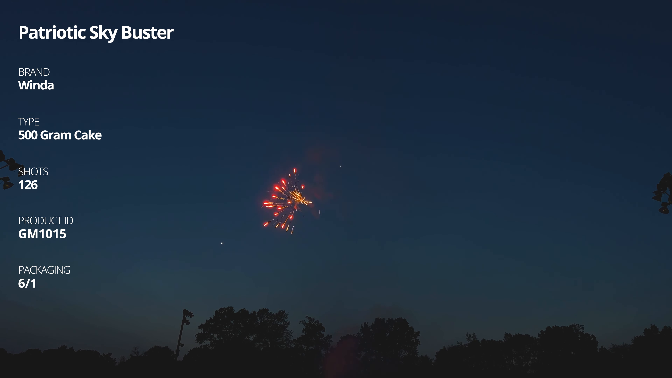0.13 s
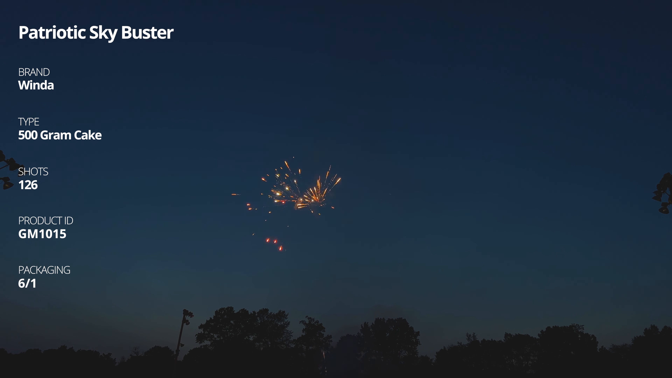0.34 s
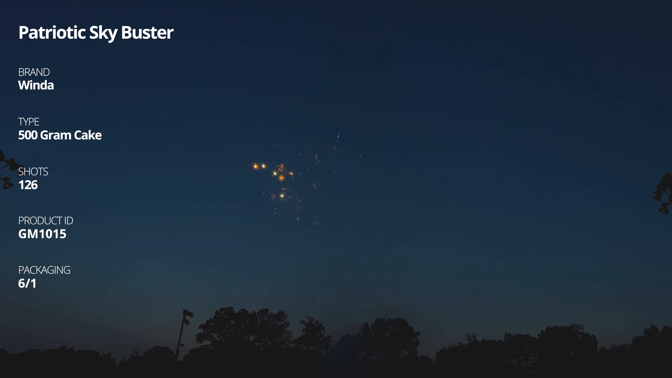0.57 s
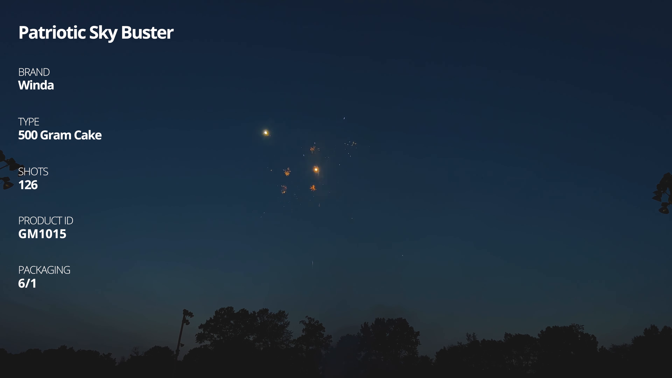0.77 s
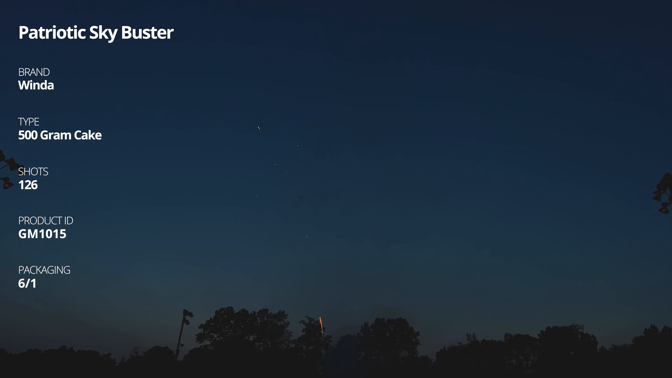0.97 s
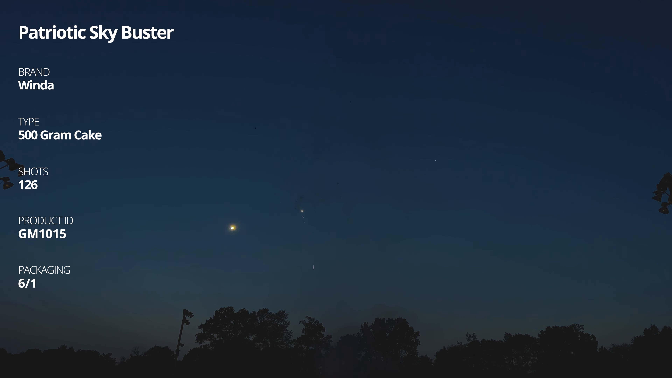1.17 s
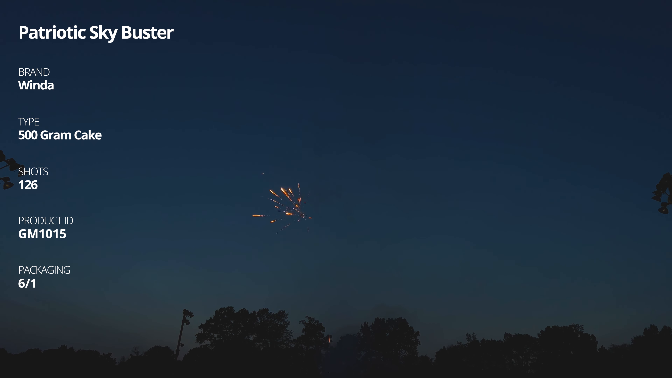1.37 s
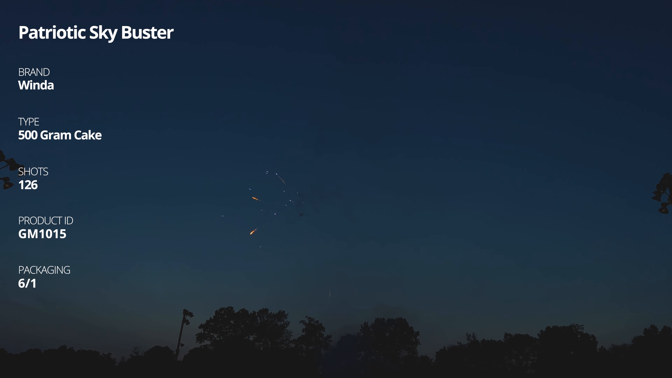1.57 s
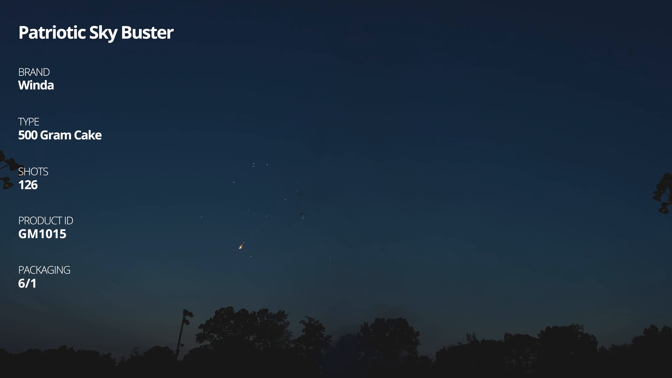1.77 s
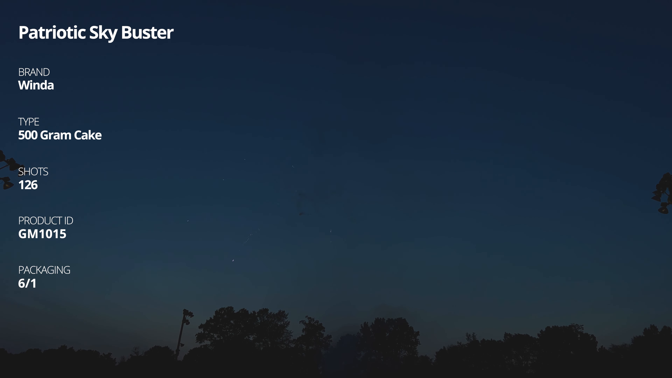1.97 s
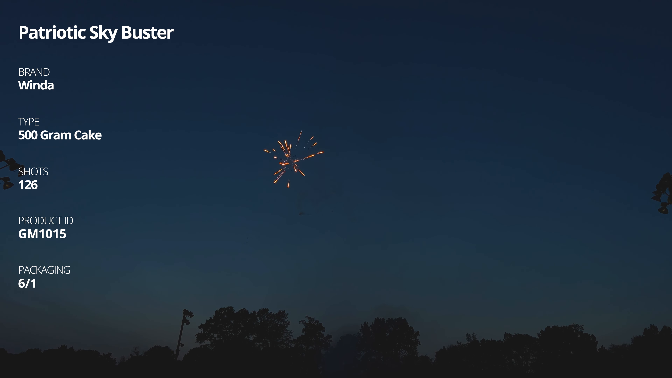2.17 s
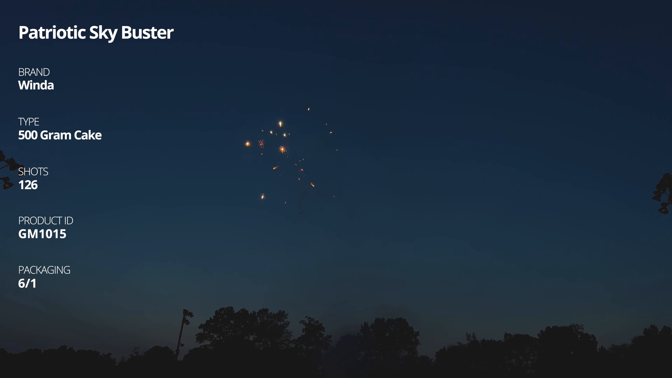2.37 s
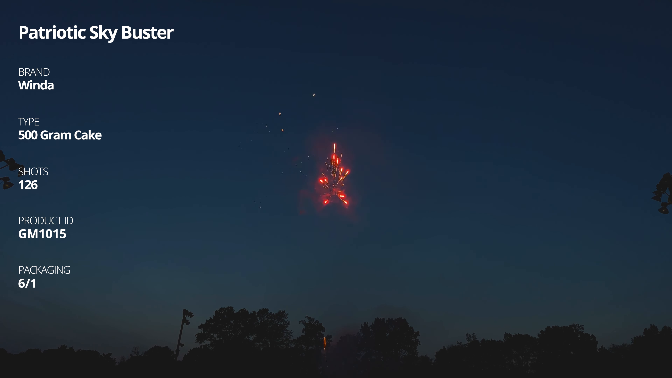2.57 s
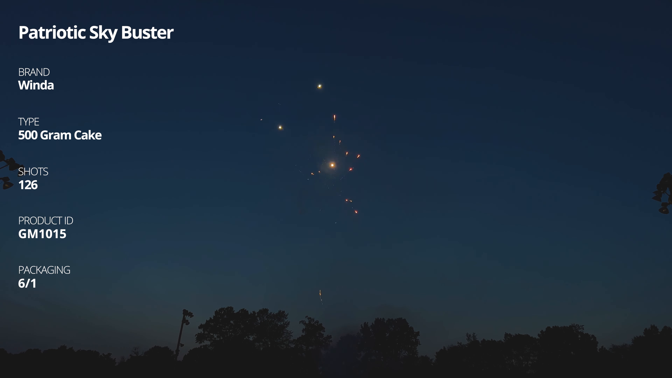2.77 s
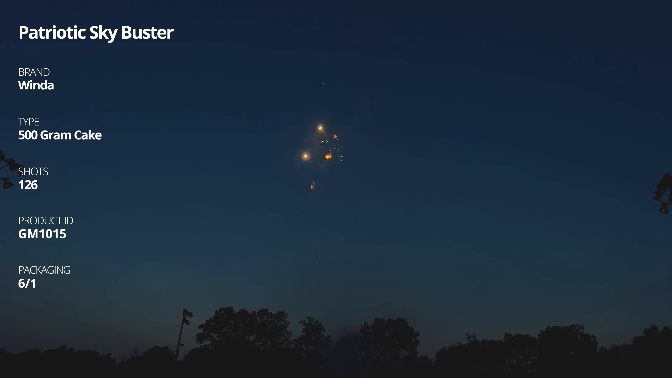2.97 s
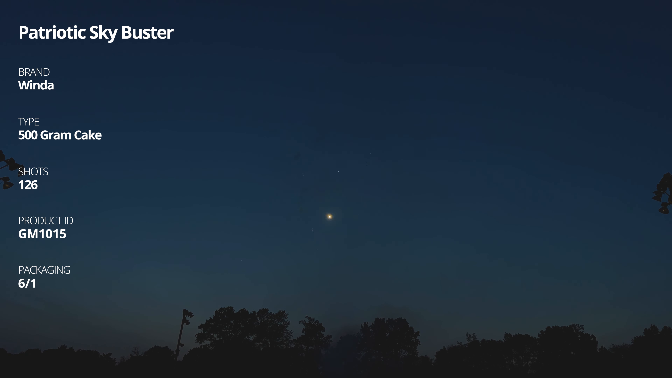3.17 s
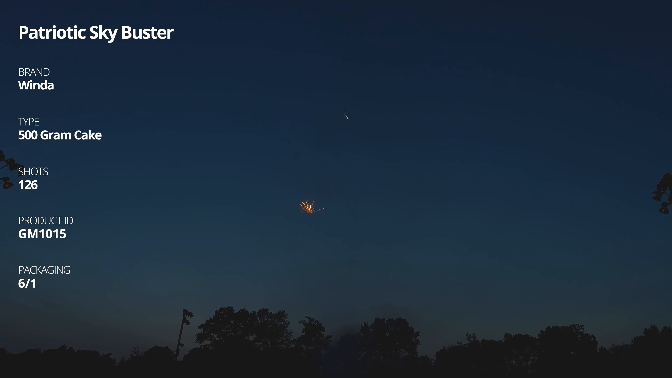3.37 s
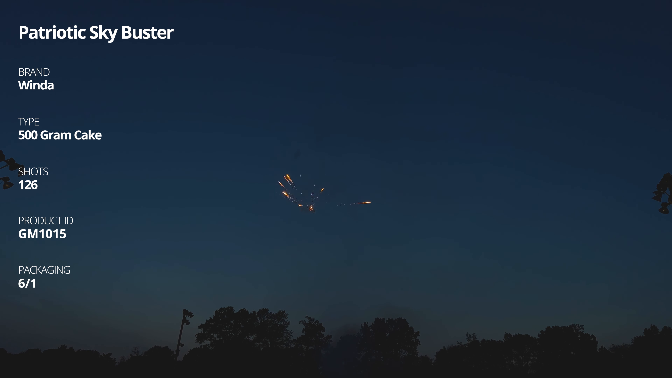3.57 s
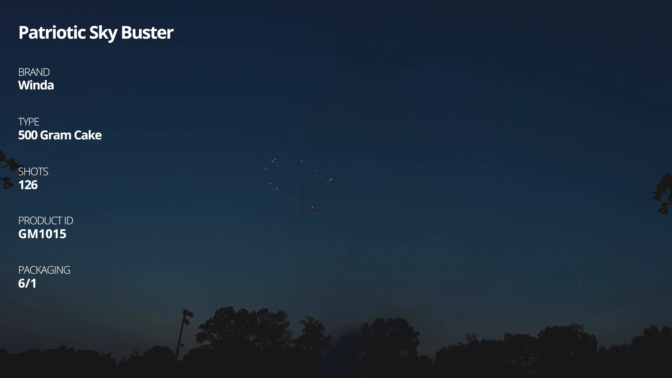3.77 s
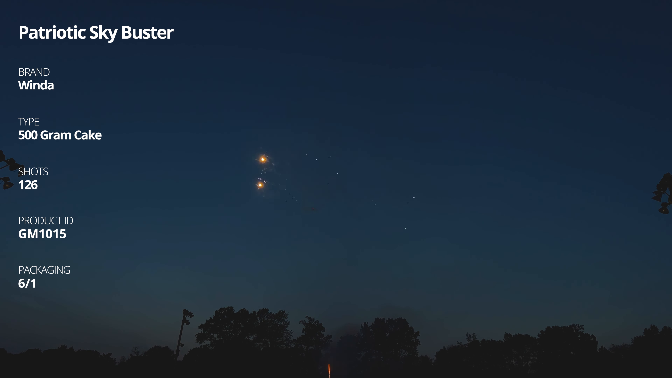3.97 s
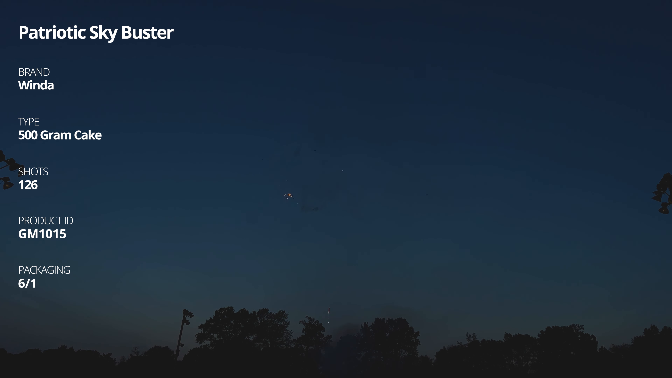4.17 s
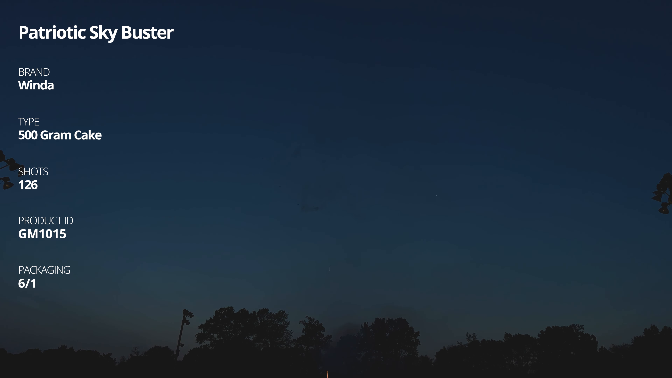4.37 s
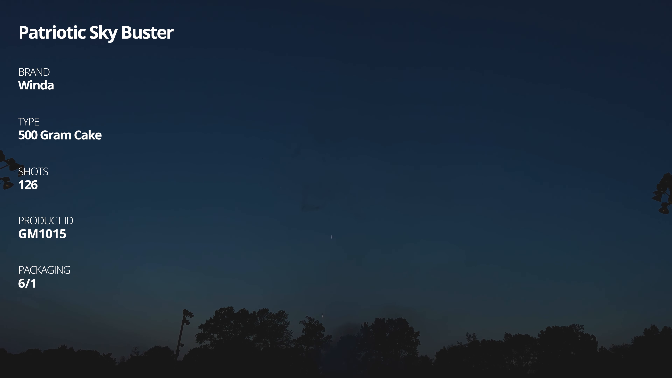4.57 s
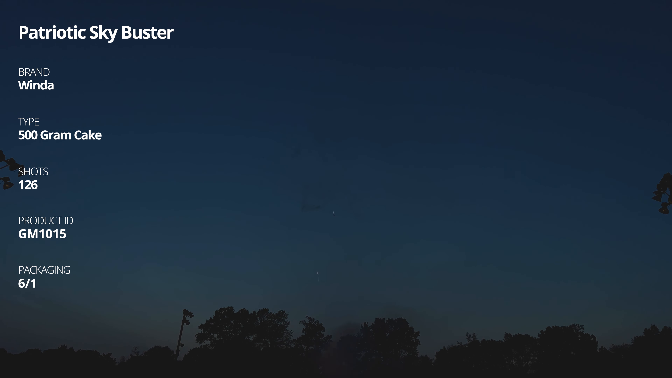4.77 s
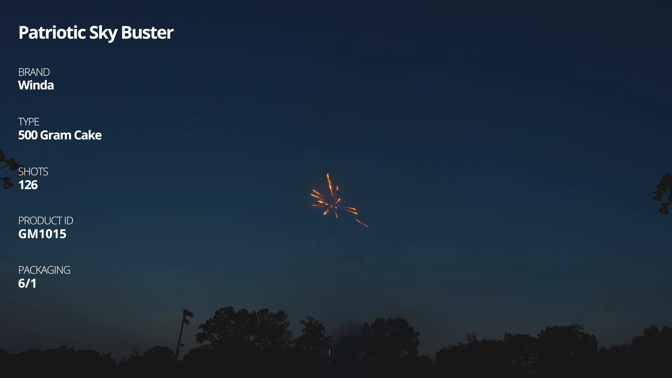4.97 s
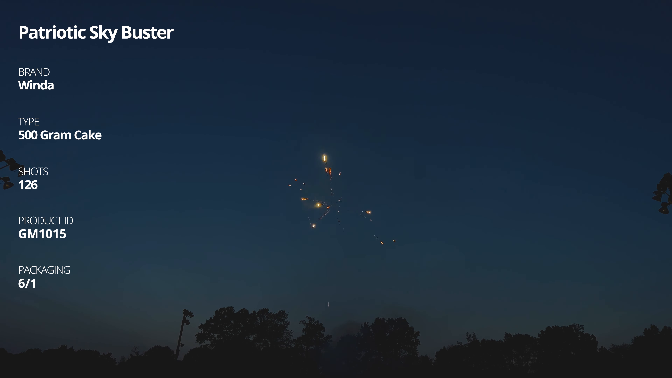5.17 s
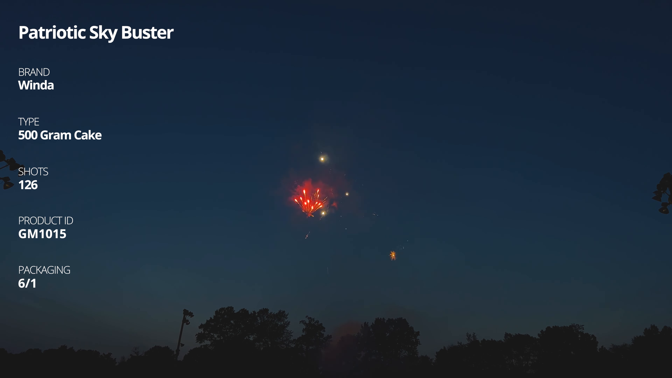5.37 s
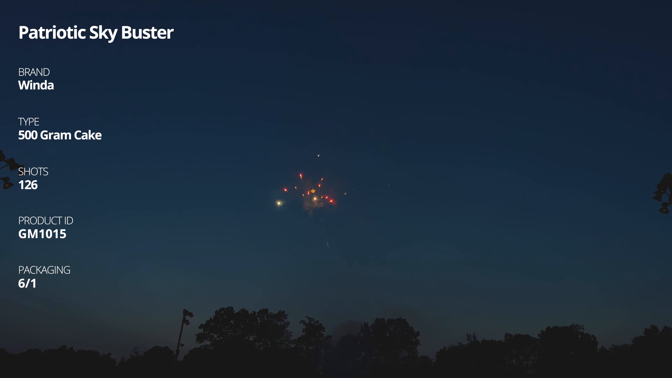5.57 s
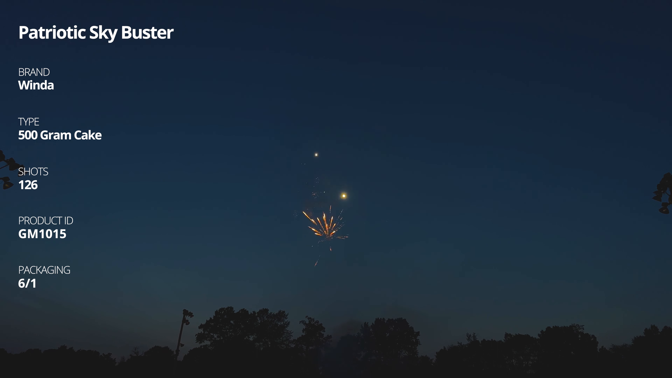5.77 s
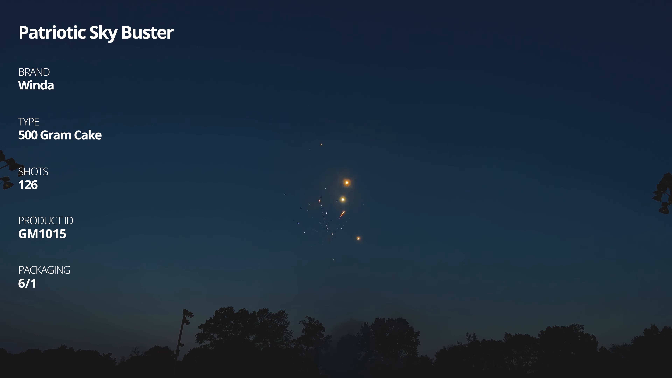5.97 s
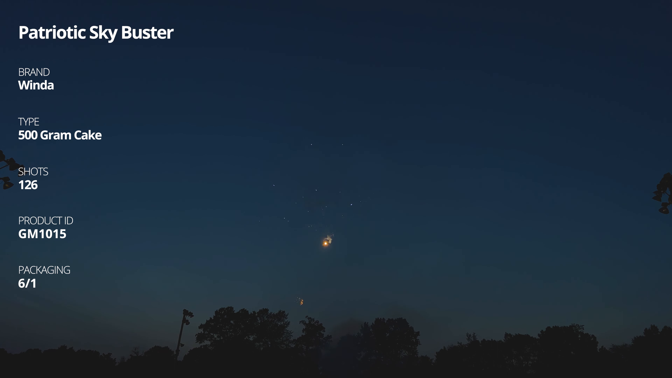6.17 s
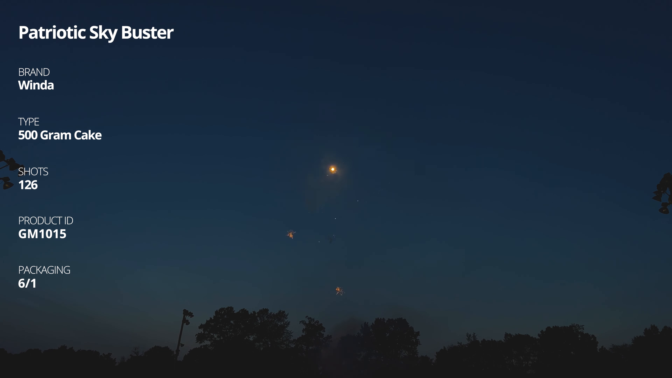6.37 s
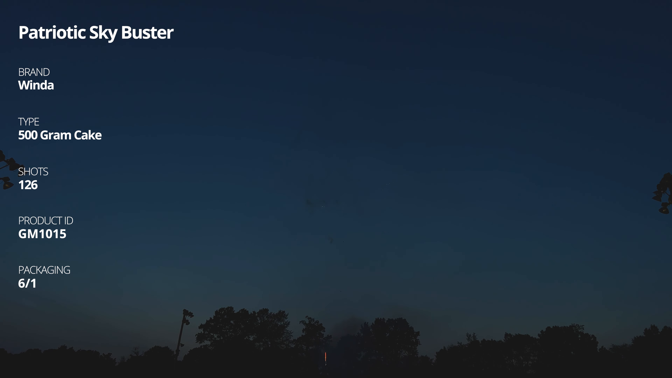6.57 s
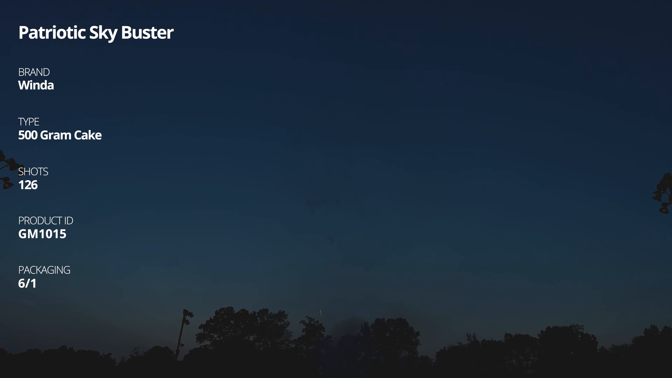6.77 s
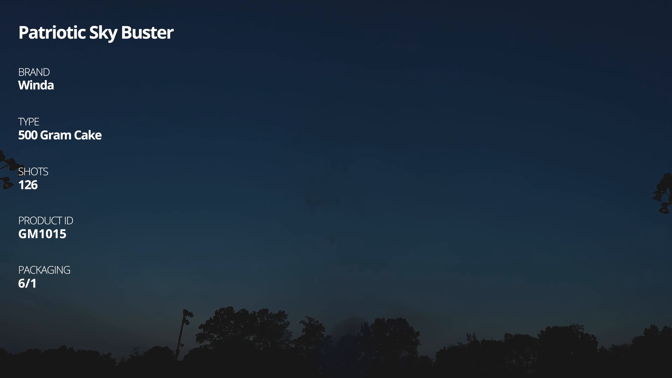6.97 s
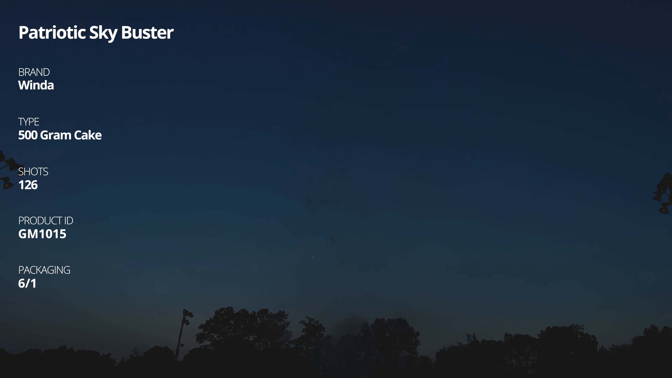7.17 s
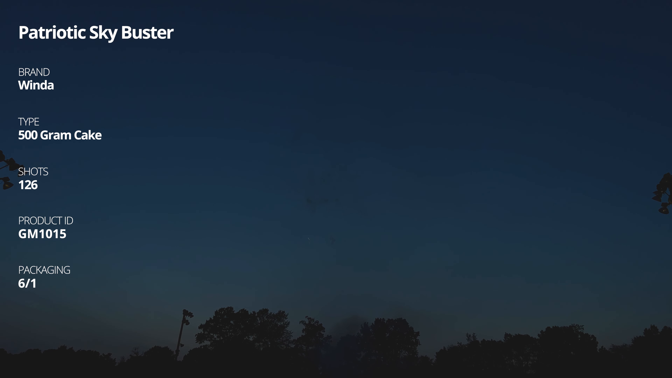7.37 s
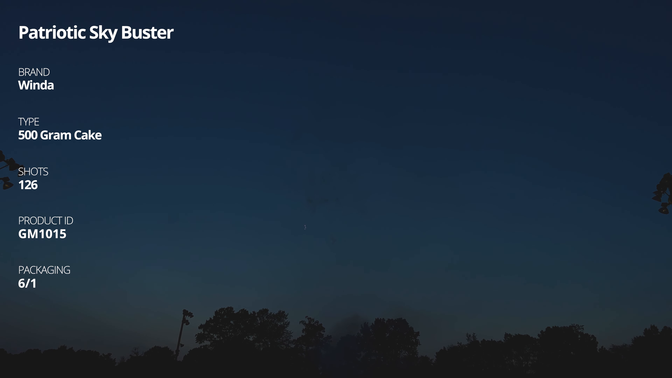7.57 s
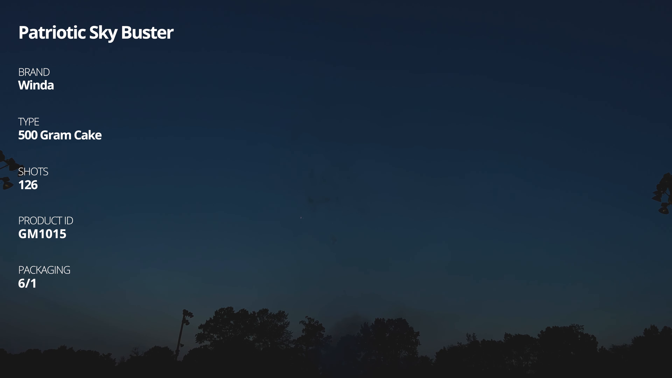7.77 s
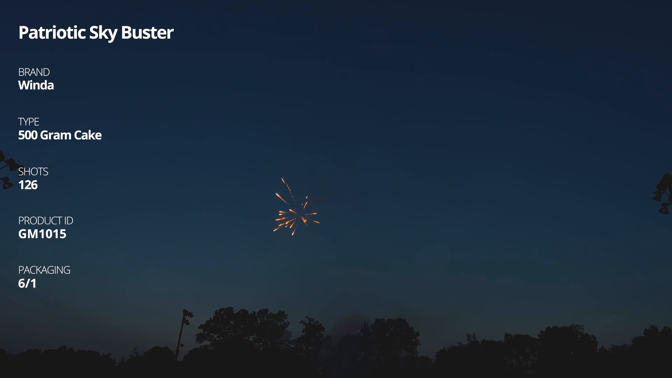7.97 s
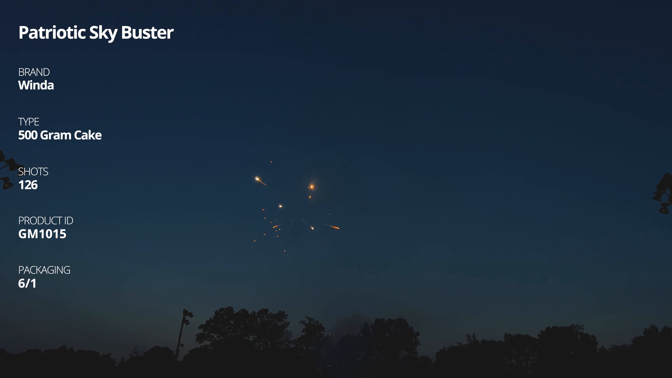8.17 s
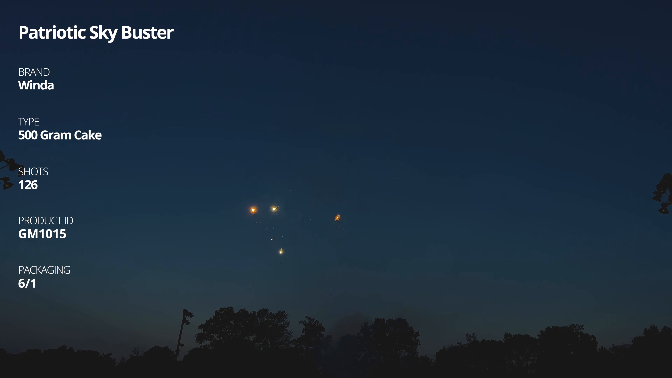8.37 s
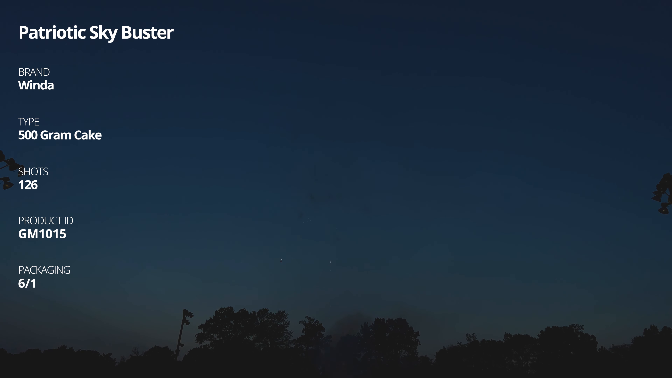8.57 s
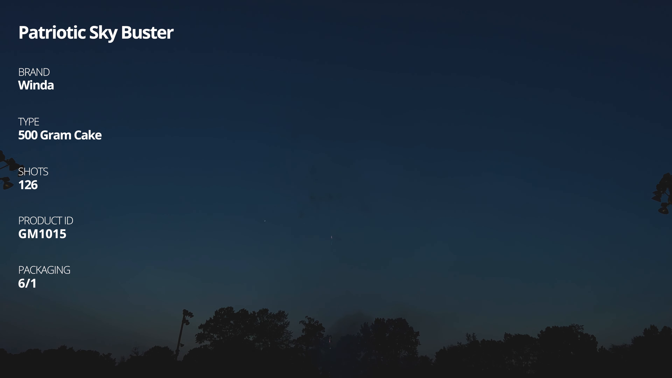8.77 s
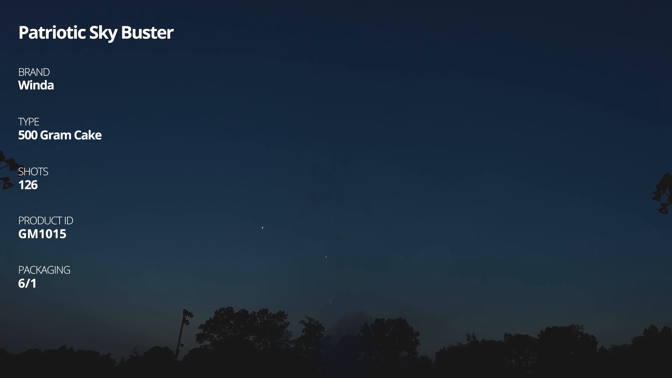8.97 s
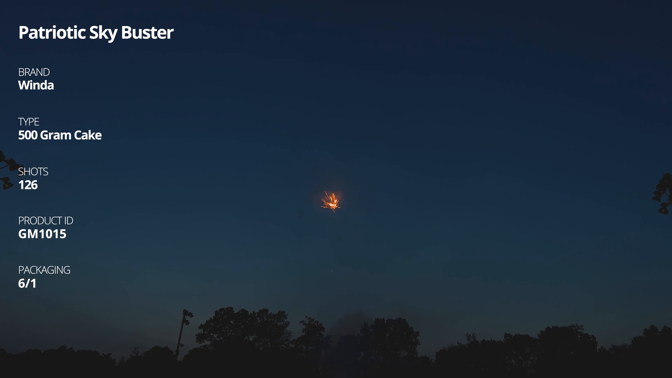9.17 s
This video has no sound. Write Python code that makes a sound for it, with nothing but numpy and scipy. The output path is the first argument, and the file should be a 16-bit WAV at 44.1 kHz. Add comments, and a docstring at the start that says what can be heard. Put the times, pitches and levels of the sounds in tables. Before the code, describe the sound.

Short, punchy firework reports crack over an open field, each trailed by rough tree-line reverberation and low echoes. Clusters of tiny, bright pops follow every burst, while snappy launches with small thumps come from the ground. Activity is densest at the start and around five to six seconds, then pauses before one last bang and crackle. Wide stereo, distorted peaks, faint engine drone and thin insect noise beneath.

```python
"""A fireworks cake on an open field at dusk: shells burst overhead with short blast waves, and their
stars pop in volleys of tiny, sharper blasts. Snaps, thumps and spits of gas come from the launch tubes.
Tree lines answer every report with grainy scatter; bursts and thumps also get distinct echoes.
Behind them lie shaped noise for air, engine drone and insects, and two sine tones for the engine hum.
Two microphones stand far apart, so reports reach the right one a few ms late; the bursts overload them."""
import sys
import numpy as np
from scipy import signal
from scipy.fft import rfft, irfft, next_fast_len
from scipy.io import wavfile
from scipy.ndimage import uniform_filter1d, map_coordinates

SR = 44100
rng = np.random.default_rng(int(sys.argv[2]) if len(sys.argv) > 2 else 0)


def materialize(psi):
    """Save the field psi as 16-bit PCM at rate SR to the path in sys.argv[1].

    A 1-D psi becomes a single channel; in a 2-D psi each row is a channel.
    """
    bounded = np.clip(np.atleast_2d(psi).T, -1, 1)
    quanta = np.round(bounded * 32767).astype(np.int16)
    wavfile.write(sys.argv[1], SR, quanta)


N = 407043


def amp(db):
    """Turn decibels into a factor on sound pressure."""
    return 10 ** (np.asarray(db) / 20)


def unit(x):
    """Scale a sound to an average (RMS) strength of 1."""
    return x / np.sqrt(np.mean(x ** 2) + 1e-20)


def along(points, hz):
    """Read a curve of (Hz, value) points on a log frequency axis."""
    point_hz, values = np.transpose(points)
    return np.interp(np.log(hz + 1), np.log(point_hz), values)


def wobble(rate):
    """A smooth random curve with rate random knots a second."""
    knots = rng.standard_normal(int(N * rate / SR) + 4)
    return map_coordinates(knots, [np.arange(N) * rate / SR])


def filtered(x, response):
    """Shape a sound by a complex response of frequency."""
    length = x.shape[-1]
    padded = next_fast_len(length + SR // 10)
    spectrum = rfft(x, padded) * response(np.fft.rfftfreq(padded, 1 / SR))
    return irfft(spectrum, padded)[..., :length]


def resonance(f, hz, width_hz):
    """Favour a band around hz, ringing only after the sound arrives."""
    return 1j * f * width_hz / (hz * hz - f * f + 1j * f * width_hz)


def dull(f, edge_hz):
    """Take away treble above the edge: a causal two-pole low-pass."""
    return 1 / (1 + 1j * np.sqrt(2) * f / edge_hz - (f / edge_hz) ** 2)


def bass_cut(f, edge_hz):
    """Take away bass below the edge: a causal two-pole high-pass."""
    return -(f / edge_hz) ** 2 * dull(f, edge_hz)


def delayed(f, seconds):
    """Delay a sound: each frequency turns its phase in step with its pitch."""
    return np.exp(-2j * np.pi * f * seconds)


def add(out, s, x):
    """Mix x into out at time s (seconds)."""
    i = int(np.clip(round(s * SR), 0, N - 1))
    out[:, i:i + x.shape[1]] += x[:, :N - i]


# Colour of the still air: freq_hz, relative level_db (per Hz)
AIR_COLOUR = [(15, -44.5), (25, -29.5), (75, -35), (131, -34), (154, -5.5), (186, -21), (250, -7),
              (335, -22), (573, -14.5), (811, -15.5), (2430, -28.5), (4040, -44), (4870, -53.5),
              (5880, -50.5), (15000, -73)]
# The far engine's hum over time: time_s, level_db
ENGINE_HUM = [(0, -78), (4.802, -73.5), (5.9, -62.5), (6.898, -60), (7.4, -58.5), (8, -61.5), (9.23, -65)]


def evening(air_db=-65, drone_db=-67, insect_db=-80, whine_db=-79):
    """Still air, a far engine's hum, drone and faint whine, and a thin band of insect song."""
    def noise(response):
        return unit(filtered(rng.standard_normal((2, N)), response))

    air = amp(air_db + 0.77 * wobble(3)) * noise(lambda f: amp(along(AIR_COLOUR, f)))
    drone = amp(drone_db) * noise(lambda f: resonance(f, 81, 42) ** 2)
    whine = amp(whine_db) * noise(lambda f: resonance(f, 790, 20) ** 2)
    insects = amp(insect_db) * noise(lambda f: resonance(f, 4850, 1000) ** 2)

    # the hum wanders around 129 Hz; its phase differs by 0.8 radians between the microphones
    hum_hz = 129 + .7 * wobble(2)
    phase = 2 * np.pi * np.cumsum(hum_hz) / SR + np.array([[0], [.8]])
    hum = np.sqrt(2) * (np.sin(phase) + amp(-21) * np.sin(2 * phase))
    hum_db = np.interp(np.arange(N) / SR, *np.transpose(ENGINE_HUM)) + wobble(2.0)
    return air + drone + whine + insects + amp(hum_db) * hum


def earlier_volley(wash_db=-61, fade_db_per_s=25):
    """The scatter of an earlier volley, a wash of noise, is still dying away at the start."""
    noise = rng.standard_normal((2, N))
    wash = unit(filtered(noise, lambda f: resonance(f, 1300, 3000) * dull(f, 5500)))
    return wash * amp(wash_db - fade_db_per_s * np.arange(N) / SR)


def blast(hz, width_hz, edge_hz, size=2048):
    """A pressure pulse of peak 1: a steep front, a suction phase and a small rebound."""
    f = np.fft.rfftfreq(size, 1 / SR)
    pulse = irfft(resonance(f, hz, width_hz) * dull(f, edge_hz))
    return pulse / pulse.max()


# Surfaces beside each microphone that return a copy of the sound: typical delay_ms, share (of pressure)
SURFACES_LEFT = [(2.1, .35), (2.65, .55), (4.7, .16)]
SURFACES_RIGHT = [(.7, 0.26), (3.5, .15)]


def at_microphones(pulse, lag_ms, edge_hz):
    """Each microphone gets the pulse and duller copies from nearby surfaces, which shift with its direction."""
    def paths(f, surfaces):
        copies = sum(share * delayed(f, delay_ms * rng.normal(1, .025) / 1000)
                     for delay_ms, share in surfaces)
        return 1 + copies / (1 + 1j * f / edge_hz)

    def both(f):
        left = paths(f, SURFACES_LEFT)
        right = paths(f, SURFACES_RIGHT) * delayed(f, lag_ms / 1000)
        return np.array([left, right])

    return filtered(pulse, both)


def grainy(shape, spread):
    """Unit noise in which a few samples stand out, as echoes of single trunks and walls do."""
    sizes = np.exp(spread * np.minimum(rng.standard_normal(shape), 2))
    return unit(rng.standard_normal(shape) * sizes)


# Fading of sound scattered by grass and trees: delay_s, level_db (of the report's energy per second)
SCATTER_FADE = [(0, 16), (.006, 10), (.013, 5), (.03, -4), (.05, -1), (.075, -5.5), (.1, -4.5),
                (.15, -11.5), (.22, -12), (.3, -21), (.5, -22.5), (1, -31), (1.8, -57.5)]
# Colour of that scatter, added to its fading: freq_hz, relative level_db
SCATTER_TINT = [(50, 12.5), (130, 5), (220, 2), (400, 2), (700, 0), (1000, 3), (1450, 0), (2200, -2),
                (4000, 1.5), (7000, 0), (14000, -5.5)]


def field(air_db=1.5, clump_db=4, right_db=3, grain=0.85):
    """A fresh stereo answer of the field: clumps of small echoes that lose treble with distance."""
    hz, t, grains = signal.stft(grainy((2, 2 * SR), grain), SR, nperseg=128)
    clumps = unit(uniform_filter1d(rng.standard_normal((2, 1, len(t))), size=5))
    level_db = np.interp(t, *np.transpose(SCATTER_FADE)) + clump_db * clumps
    # the air takes air_db per kHz and second of travel
    level_db = level_db - air_db * np.outer(hz / 1000, t)
    tint_db = along(SCATTER_TINT, hz)[:, None]
    tail = signal.istft(grains * amp(level_db + tint_db), SR, nperseg=128)[1]

    t = np.arange(tail.shape[1]) / SR
    fade_in = 1 - np.exp(-t / 0.00014)
    # the early scatter is stronger on the right
    balance = amp(np.outer([-.5, .5], right_db * np.exp(-t / .1)))
    return tail * fade_in * balance / np.sqrt(SR)


def scattered(x):
    """The field's answer to a mono sound."""
    return signal.fftconvolve(np.atleast_2d(x), field(), axes=1)


# Shell bursts: start_s, level_db (peak of the plain blast), lag_ms (of the right microphone), pitch_hz,
# treble_edge_hz, scatter_db, echoes_db, burn_s (mean for its small stars), burn_spread_s (either way),
# small_stars (how many)
SHELLS = [(0.1757, 11.5, 3.07, 1000, 6500, -2, -2.5, 0.5, 0.11, 10),
          (0.3254, 9.5, 3.18, 1250, 9500, 1, -1.5, 0.47, 0.1, 13),
          (0.4454, 12.5, 3.8, 1050, 7560, -1.5, -5, .53, .13, 13),
          (1.4183, 9.5, 3.15, 1000, 7560, 1.5, 0, 0.45, 0.05, 2),
          (2.252, 13, 3.23, 993, 12000, -3, -4.5, 0.4, 0.11, 6),
          (2.6403, 6.5, 3.9, 1190, 8750, 2.5, 0, .53, .125, 12),
          (3.5628, 12, 3.42, 950, 8500, 0.5, -1.5, .525, .04, 2),
          (5.062, 12, 4.33, 950, 6000, -1, -5, .46, .06, 5),
          (5.4287, 4.5, 3.04, 2000, 7500, -3, 1, 0.49, 0.073, 13),
          (5.8653, 11.5, 4.2, 1050, 7000, 0, -4, .53, 0.1, 12),
          (8.0426, 12, 3.04, 980, 7500, -0.5, -2.5, .445, 0.019, 2)]
# Distinct echoes of a burst: left_delay_s, right_delay_s, level_db, treble_edge_hz, smear_s;
# the delays and levels are typical ones that vary from burst to burst
TREE_ECHOES = [(.085, .083, -4, 250, .003), (.098, .096, -20, 2000, .005), (.1, .098, -8, 260, .004),
               (.18, .176, -33, 2500, .003), (.246, .263, -24.5, 3500, .0015),
               (.333, .345, -32, 1800, .007)]
# shells burst in different places: scatter of an echo's delay (share) and level
ECHO_SHIFT, ECHO_SPREAD_DB = 0.0024, 1.5


def bursts(width=0.89, low_hz=105, smeared=1.1):
    """Each shell gives one blast wave, then scatter and echoes from the tree lines."""
    out, t = np.zeros((2, N)), np.arange(SR // 25) / SR
    for s, db, lag_ms, hz, treble_hz, scatter_db, echoes_db, *_ in SHELLS:
        pulse = amp(db) * blast(hz, width * hz, treble_hz)
        direct = filtered(pulse, lambda f: bass_cut(f, low_hz))
        add(out, s, at_microphones(direct, lag_ms, edge_hz=6000))
        add(out, s + .003, amp(scatter_db) * scattered(pulse))
        for left_s, right_s, echo_db, edge_hz, smear_s in TREE_ECHOES:
            for side, delay in zip(np.eye(2), (left_s, right_s)):
                # a clean reflection, trailed by those from deeper in the trees
                smear = rng.standard_normal(len(t)) * t * np.exp(-2 * t / smear_s)
                paths = (t == 0) + smeared * smear / np.linalg.norm(smear)
                echo = signal.fftconvolve(pulse, paths)
                echo = filtered(echo, lambda f: dull(f, edge_hz) * bass_cut(f, low_hz))
                shift, level = rng.standard_normal(2)
                gain = amp(echo_db + echoes_db + ECHO_SPREAD_DB * level)
                add(out, s + delay * (1 + ECHO_SHIFT * shift), gain * np.outer(side, echo))
    return out


# level of a small star and its scatter, on the same scale as the listed cracks
SMALL_STAR_DB, SMALL_STAR_SPREAD_DB = -13.5, 5
LAG_SPREAD_MS = 2  # stars fly apart, so their lags scatter around the shell's


def volleys(count=16):
    """Each burst lights small stars, which burn about half a second and pop: rows start_s, level_db, lag_ms."""
    rows = []
    for s, _, lag_ms, *_, burn_s, spread_s, number in SHELLS:
        turn = rng.random(count)
        level, place = rng.standard_normal((2, count))
        n = int(np.clip(round(number), 1, count))
        # one star at a random moment in each of n equal slots, from -1 (early) to 1 (late)
        early_late = 2 * (np.arange(n) + turn[:n]) / n - 1
        rows += zip(s + burn_s + spread_s * early_late,
                    SMALL_STAR_DB + SMALL_STAR_SPREAD_DB * level[:n],
                    lag_ms + LAG_SPREAD_MS * place[:n])
    return rows


# The loudest and the lone star cracks: start_s, level_db (before star_db), lag_ms (of the right microphone)
STAR_CRACKS = [(.552, -14.5, 2.3), (.623, -18, 1.5), (.6494, -10, 1.5), (.7225, -13.5, 1.8),
               (.733, -2.5, 1.7), (.746, -12.5, 3.2), (.7492, -4, 2.3), (.7716, -2.5, 2.3),
               (.787, -6.5, 2.2), (.8385, -3.5, .9), (.9082, -16, 2.7), (.9462, -7, 1.7), (.9772, -6, 4.3),
               (1.0343, -7, 3.3), (1.089, -8, 3.9), (1.2451, -19.5, 4.9), (1.714, -19, 3.5),
               (1.8986, -8.5, 2.2), (1.9514, -7, 2), (1.9713, -9.5, 3.2), (2.9753, -16, 4),
               (3.0002, -8, 5.3), (3.095, -7, 3.9), (3.1523, -4.5, 2.4), (3.2001, -5, 3.5),
               (3.221, -9.5, 3.4), (3.2799, -5.5, 4.1), (3.3202, -8, 5.3), (3.3563, -8.5, 5.5),
               (3.5342, -11, 5.1), (3.9125, -20, 3.8), (4.0514, -7, 1.9), (4.0863, -8, 1.8),
               (4.1192, -8, 4.2), (4.1503, -4.5, 6.5), (4.1971, -4.5, 2.2), (4.209, -6, .6),
               (4.2271, -6, 3.7), (4.3948, -20, 2.7), (5.3197, -13.5, 4), (5.4926, -9, 3.1),
               (5.5283, -5.5, 2.6), (5.5825, -8.5, 4.6), (5.6303, -10, 4.5), (5.6552, -12.5, 3.1),
               (5.809, -12.5, 3.7), (5.9859, -6.5, 3), (6.0378, -6, 3.6), (6.0655, -5, 3),
               (6.2223, -9.5, 5.1), (6.2549, -5.5, 3.8), (6.3195, -4, 5.2), (6.354, -6, 3.5),
               (6.451, -3.5, 3.8), (6.4863, -4.5, 4.6), (6.5741, -7, 4.3), (6.61, -6.5, 4.3),
               (6.7204, -20.5, 4), (8.3993, -17, 3.6), (8.4375, -15.5, 2.3), (8.5084, -11.5, 1.8),
               (8.5677, -11.5, 1.9), (8.5887, -7, .9), (8.668, -9, 1.6), (8.7248, -8, 2.3)]


def stars(star_db=-1, scatter_db=-0.5, faint_db=-24, count=5):
    """Every star pops with a tiny sharp blast; a fainter one goes off close to it in time."""
    out, groups = np.zeros((2, N)), np.zeros((count, 1, N))
    pops = list(STAR_CRACKS) + volleys()
    chance = rng.standard_normal((len(pops), 4))
    for k, ((s, db, lag_ms), (size, offset, level, place)) in enumerate(zip(pops, chance)):
        # louder stars are bigger and so deeper
        hz = 2600 * np.exp(.38 * size - .02 * (db + 10))
        pulse = amp(db + star_db) * blast(hz, 2.2 * hz, edge_hz=7630)
        # the main pop is a little stronger on the right
        add(out, s, amp([[-.6], [.6]]) * at_microphones(pulse, lag_ms, edge_hz=24000))
        faint = at_microphones(pulse, abs(lag_ms + place), edge_hz=7000)
        add(out, s + 0.016 * offset, amp(faint_db + 2 * level) * faint)
        add(groups[k % count], s + 0.003, pulse[None])
    # pops take turns among five groups, each with a fresh random scatter tail
    return out + amp(scatter_db) * sum(scattered(group)[:, :N] for group in groups)


# Lift charges in the tubes: start_s, thump_db, snap_db (at the muzzle)
LIFT_CHARGES = [(.929, -27.5, -13), (1.3288, -29, -13.5), (2.539, -27.5, -18.5), (4.037, -31, -15),
                (4.4552, -27, -12), (4.964, -29, -15.5), (6.549, -32, -19.5), (8.682, -30, -23.5)]


def lifts(left_echo_db=-6, right_echo_db=0, scatter_db=-8, gas_db=-21):
    """A double snap and a spit of gas at the muzzle, the tube's short thump, and its deeper echo from the trees."""
    out, t = np.zeros((2, N)), np.arange(SR // 2) / SR
    # the ground repeats the snap almost at once
    snap = filtered(blast(3000, 3000, edge_hz=5200), lambda f: 1 + .85 * delayed(f, .00032))
    thump = -filtered(blast(180, 220, edge_hz=380), lambda f: resonance(f, 165, 300))
    thump = thump / np.abs(thump).max()
    echo = filtered(thump, lambda f: dull(f, 190))
    echo_sides = amp([left_echo_db, right_echo_db])
    gas_swell = (t / 0.015) * np.exp(1 - t / 0.0079)
    fuse_swell = (t / .08) * np.exp(1 - t / .08)
    for s, thump_db, snap_db in LIFT_CHARGES:
        gas = rng.standard_normal((2, len(t)))
        gas = unit(filtered(gas, lambda f: resonance(f, 3200, 3500) * dull(f, 6300)))
        fuse = rng.standard_normal((2, len(t)))
        fuse = unit(filtered(fuse, lambda f: resonance(f, 5250, 1400) ** 2))
        muzzle = amp(thump_db) * thump + amp(snap_db) * snap
        # left first, then the right 3.6 ms later
        add(out, s, np.outer([1, 0], muzzle))
        add(out, s + .0036, np.outer([0, 1.1], muzzle))
        add(out, s - .002, amp(snap_db + gas_db) * gas * gas_swell)
        # the fuse hisses faintly while the shell climbs
        add(out, s, amp(snap_db - 49) * fuse * fuse_swell)
        add(out, s + .087, np.outer(echo_sides, amp(thump_db) * echo))
        add(out, s, amp(scatter_db) * scattered(muzzle))
    return out


def scene():
    """The fireworks, slightly stronger on the right, over the evening and the earlier volley's wash."""
    fireworks = bursts() + stars() + lifts()
    return fireworks * amp([[-.4], [.4]]) + evening() + earlier_volley()


TOP_HZ = 16000  # band limit


def record(dry, low_hz=48, soft_hz=12500):
    """The inputs clip near full scale; then deep bass is cut, the treble softened and the top cut off."""
    clipped = dry / (1 + np.abs(dry / .97) ** 8) ** (1 / 8)

    def response(f):
        top_cut = 1 / (1 + (f / TOP_HZ) ** 80)
        return bass_cut(f, low_hz) * np.abs(dull(f, soft_hz)) * top_cut

    return filtered(clipped, response)


dry = scene()
out = record(dry)
materialize(out)
```